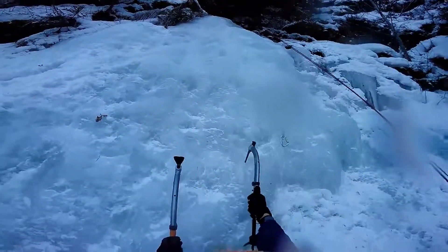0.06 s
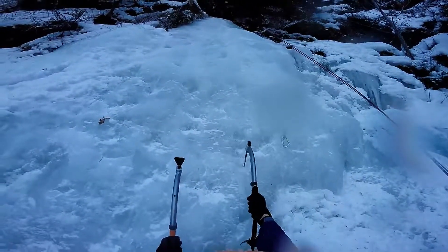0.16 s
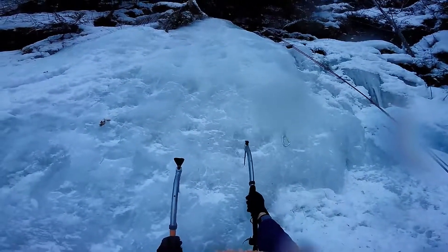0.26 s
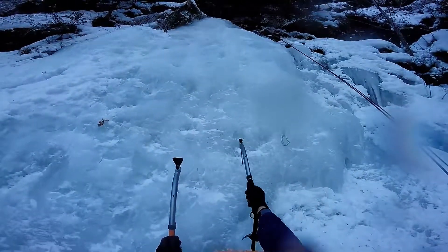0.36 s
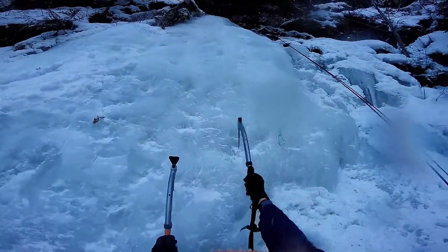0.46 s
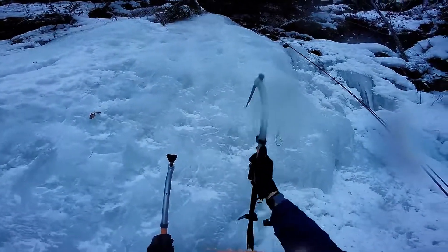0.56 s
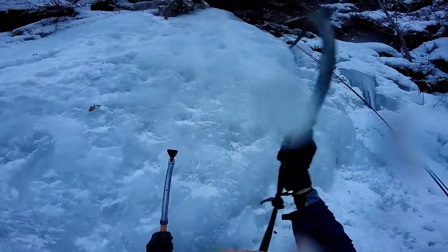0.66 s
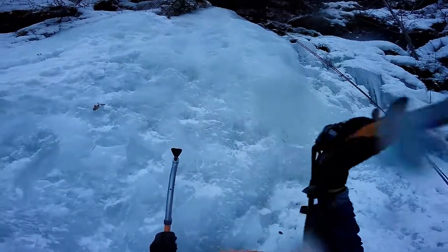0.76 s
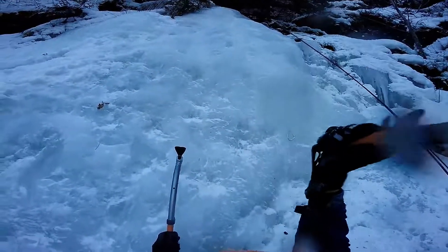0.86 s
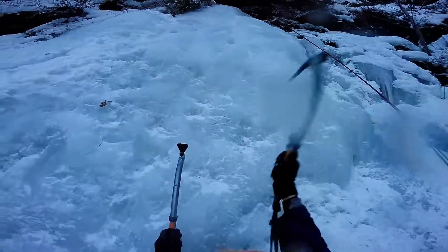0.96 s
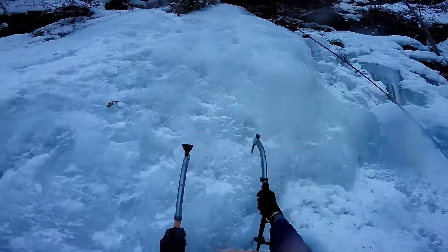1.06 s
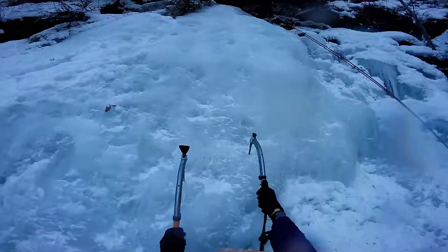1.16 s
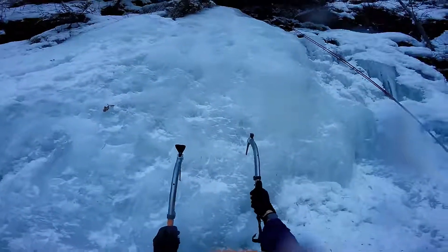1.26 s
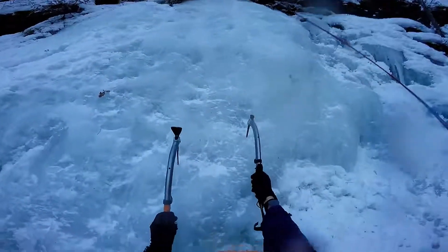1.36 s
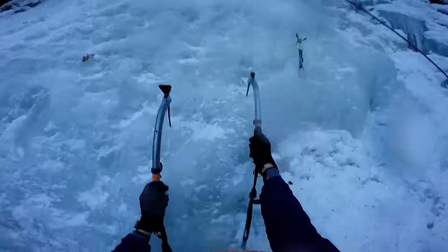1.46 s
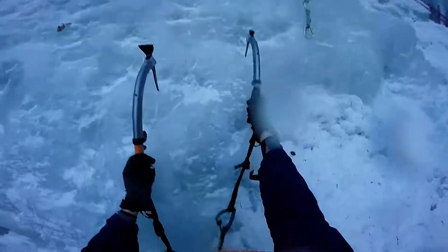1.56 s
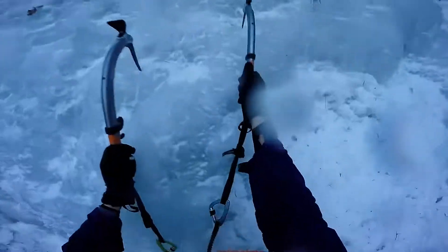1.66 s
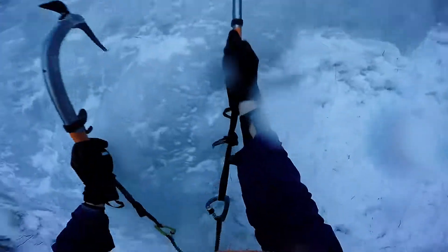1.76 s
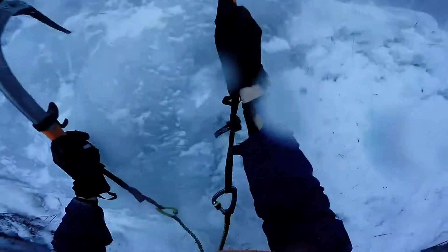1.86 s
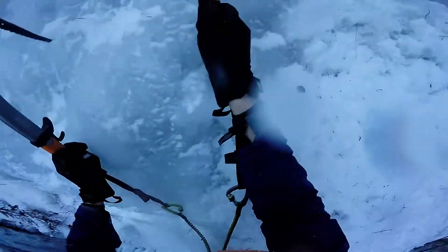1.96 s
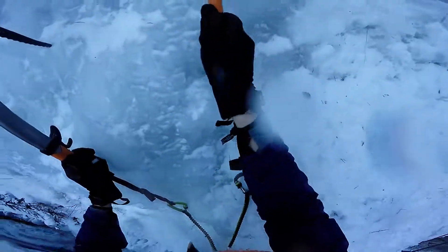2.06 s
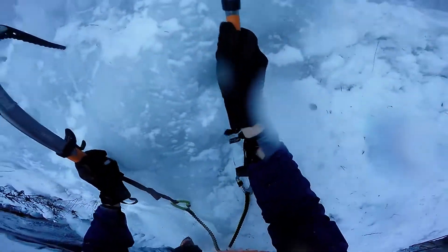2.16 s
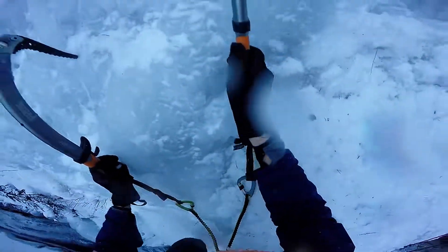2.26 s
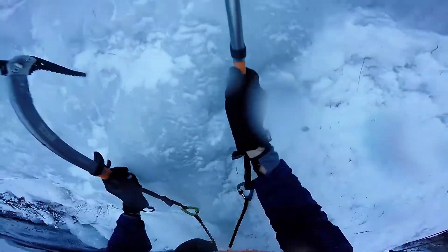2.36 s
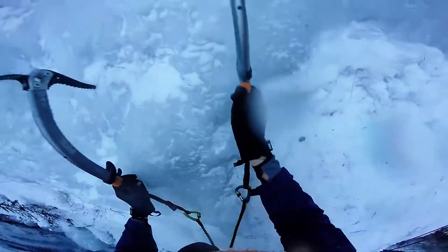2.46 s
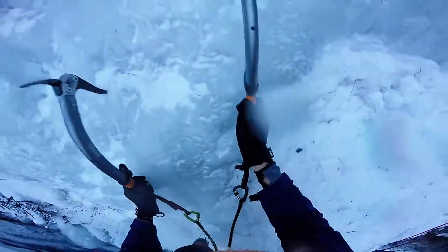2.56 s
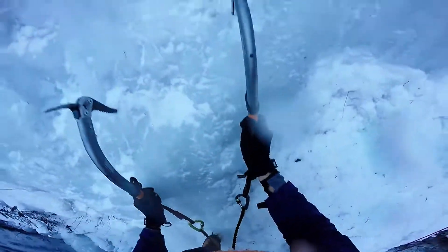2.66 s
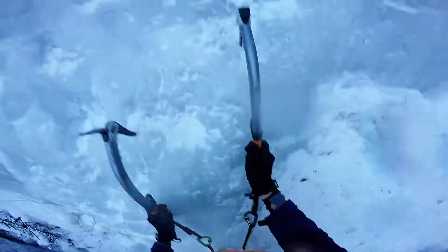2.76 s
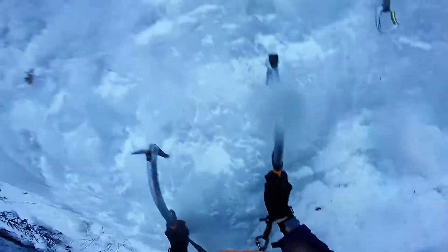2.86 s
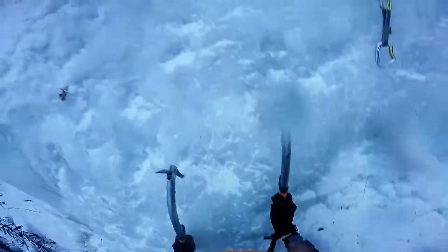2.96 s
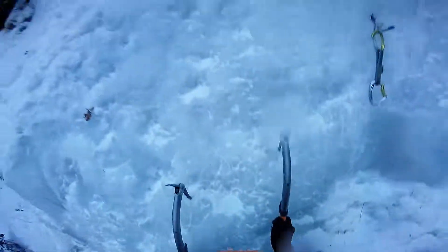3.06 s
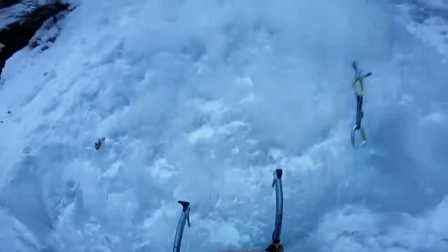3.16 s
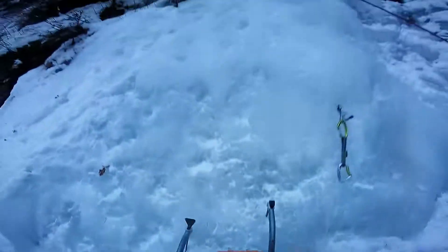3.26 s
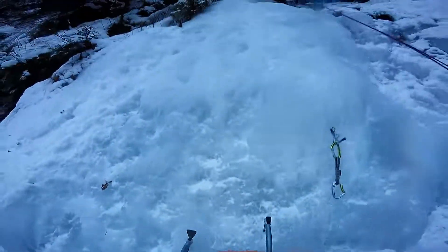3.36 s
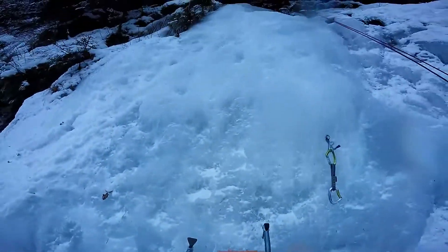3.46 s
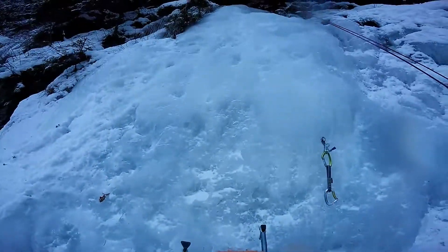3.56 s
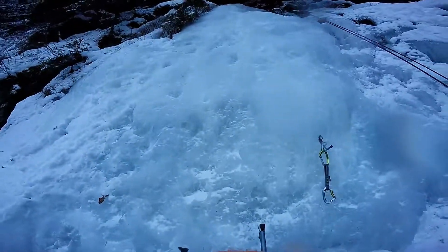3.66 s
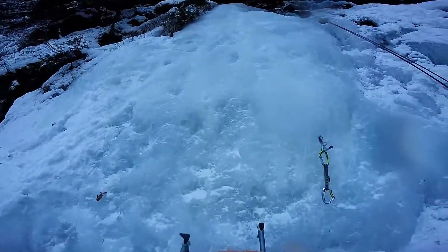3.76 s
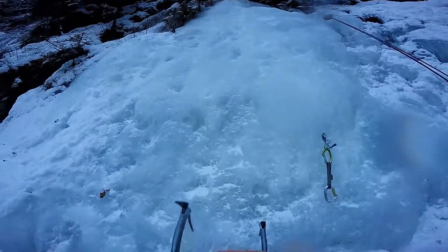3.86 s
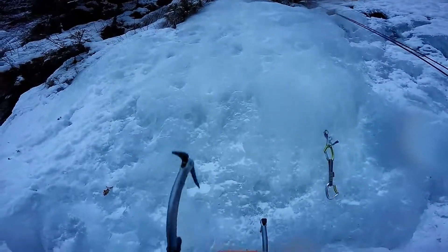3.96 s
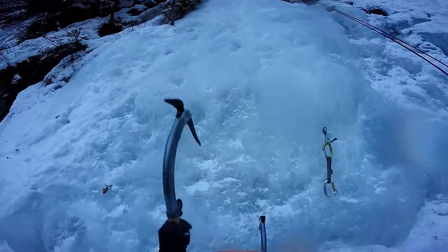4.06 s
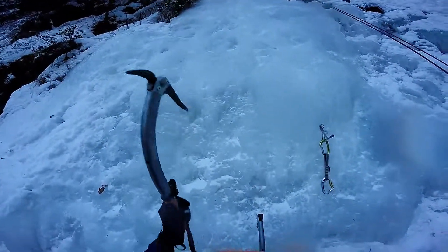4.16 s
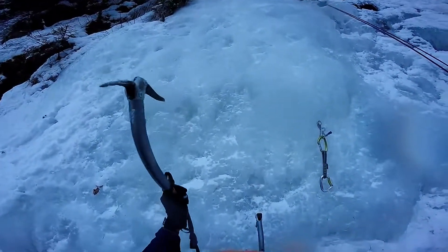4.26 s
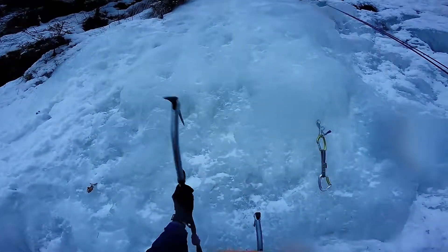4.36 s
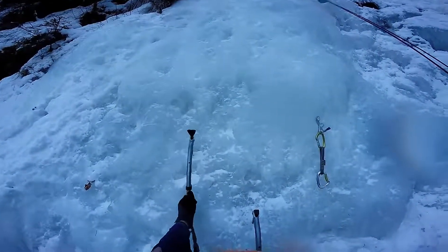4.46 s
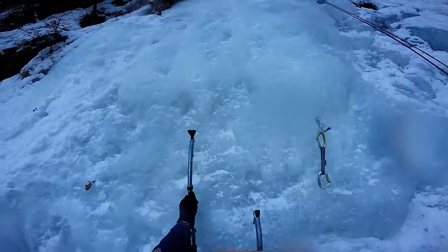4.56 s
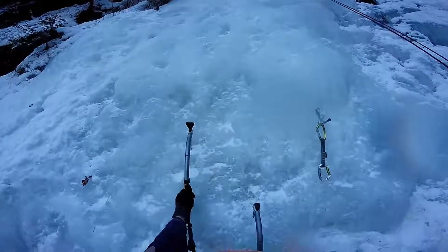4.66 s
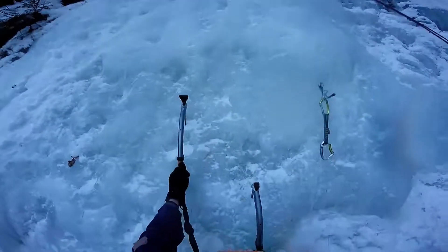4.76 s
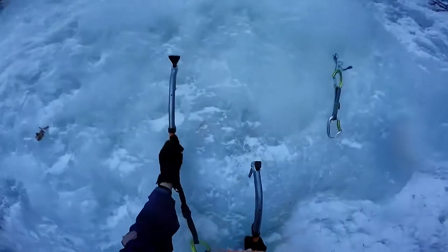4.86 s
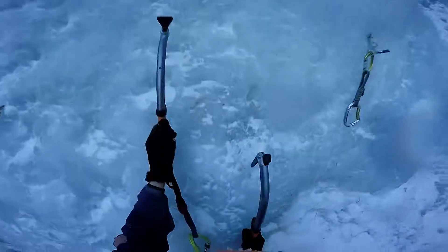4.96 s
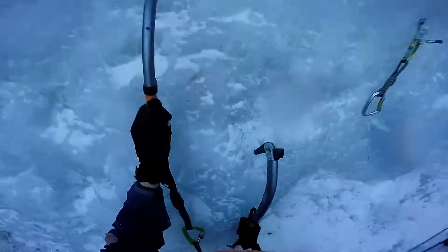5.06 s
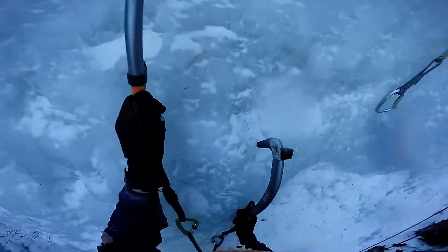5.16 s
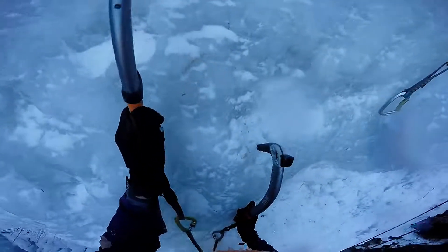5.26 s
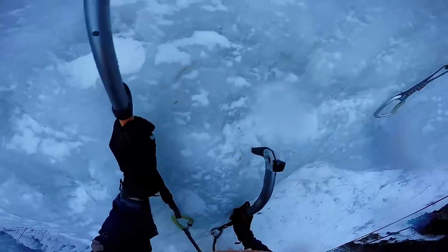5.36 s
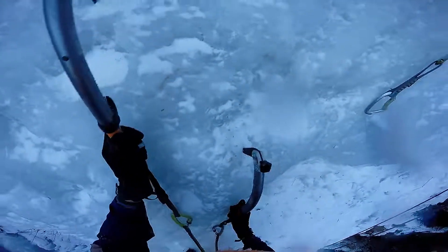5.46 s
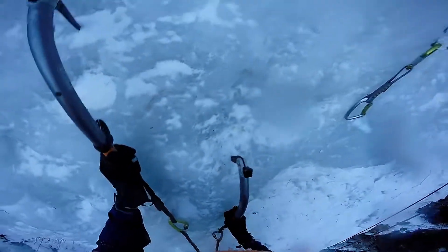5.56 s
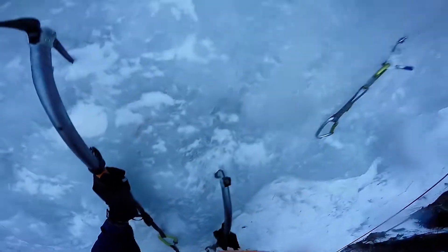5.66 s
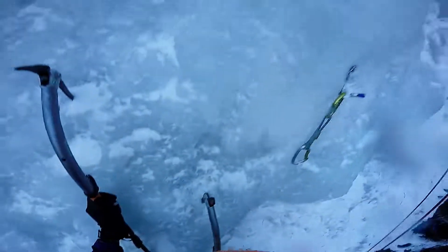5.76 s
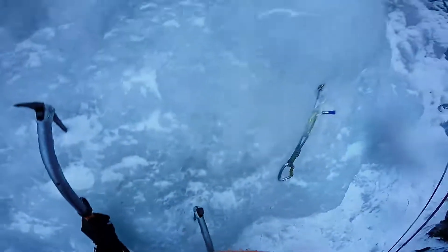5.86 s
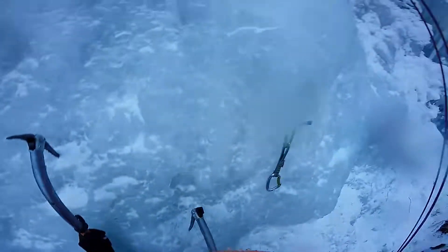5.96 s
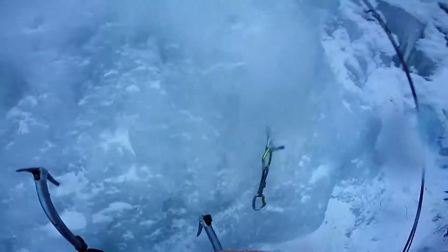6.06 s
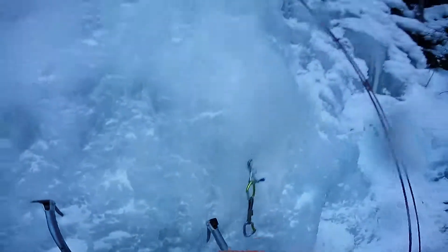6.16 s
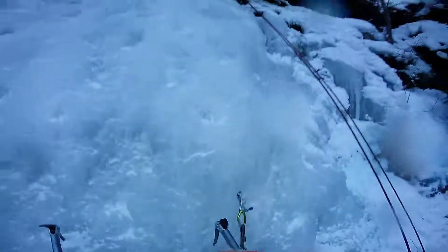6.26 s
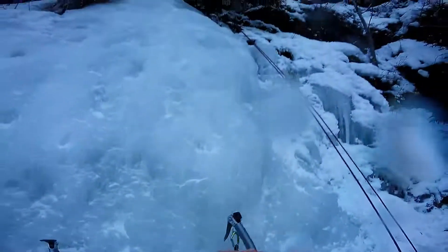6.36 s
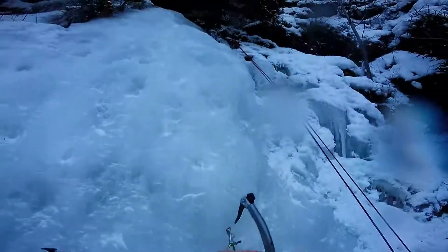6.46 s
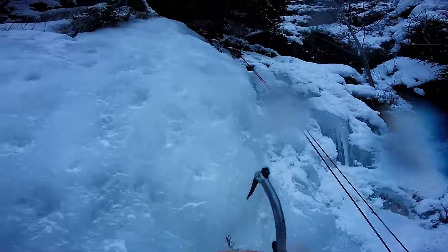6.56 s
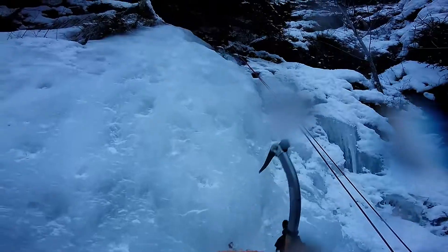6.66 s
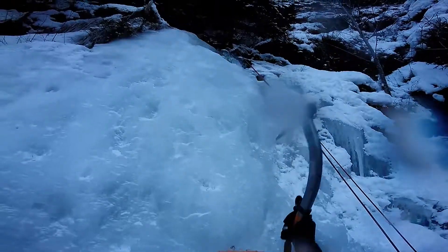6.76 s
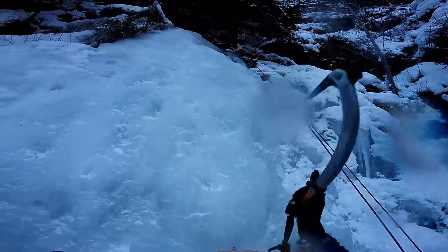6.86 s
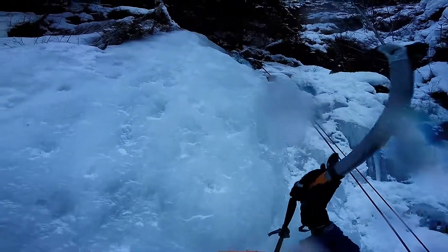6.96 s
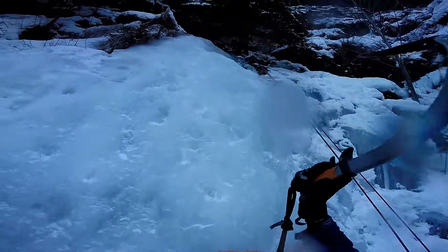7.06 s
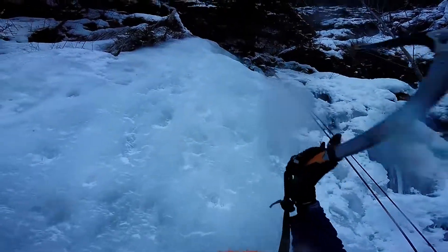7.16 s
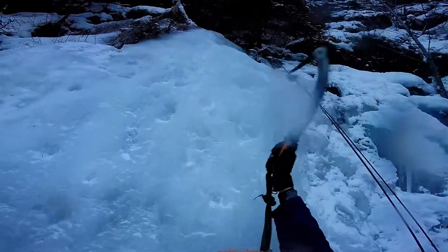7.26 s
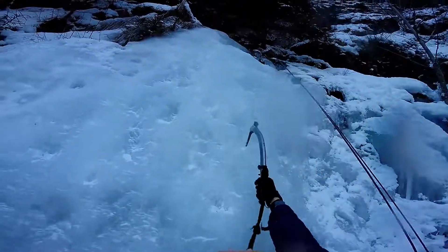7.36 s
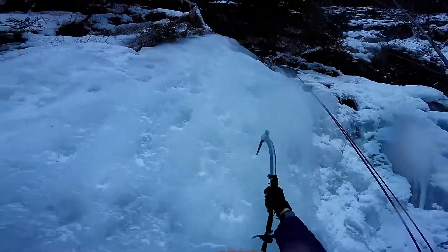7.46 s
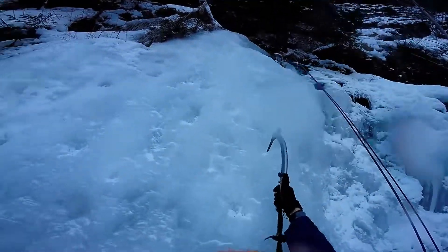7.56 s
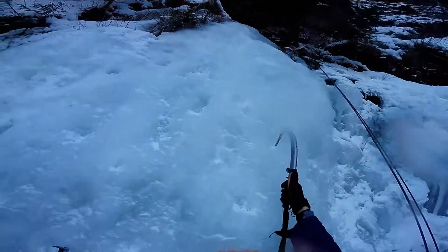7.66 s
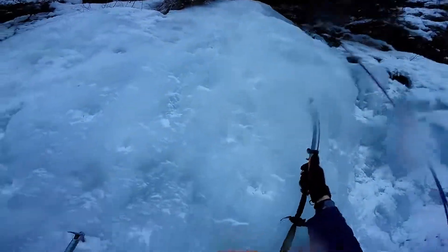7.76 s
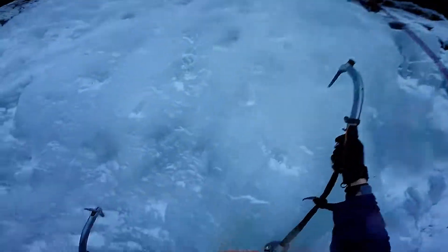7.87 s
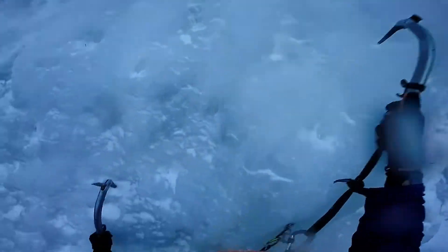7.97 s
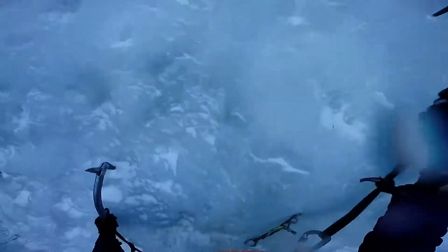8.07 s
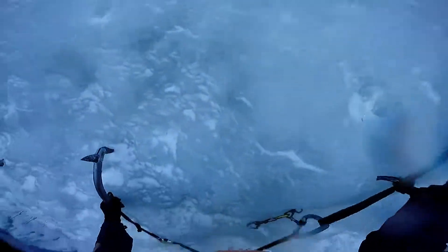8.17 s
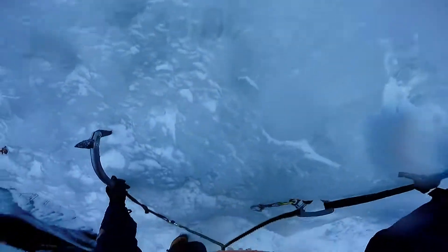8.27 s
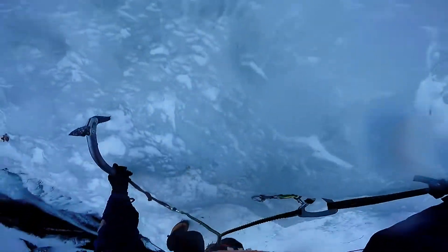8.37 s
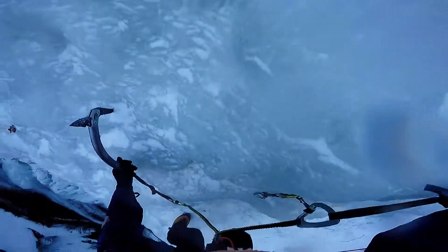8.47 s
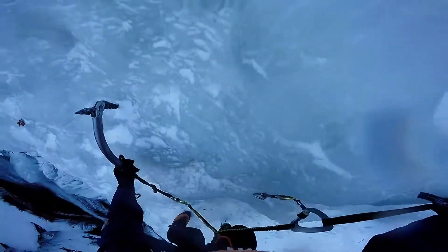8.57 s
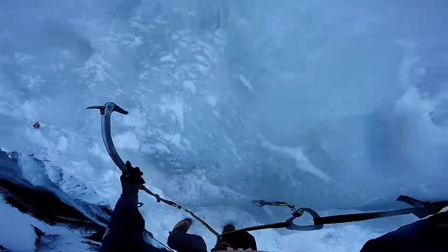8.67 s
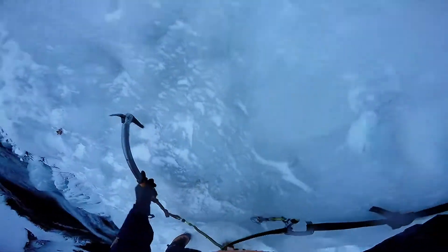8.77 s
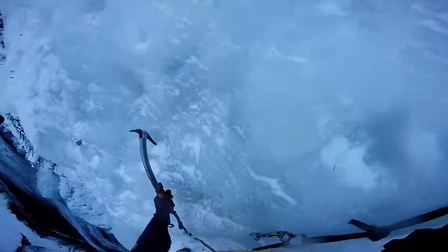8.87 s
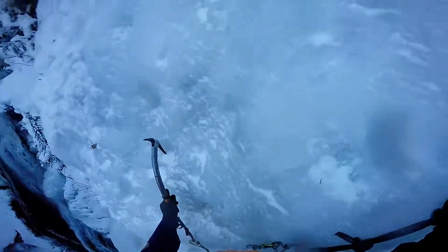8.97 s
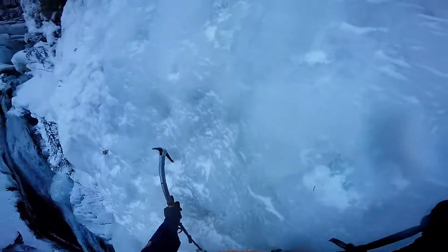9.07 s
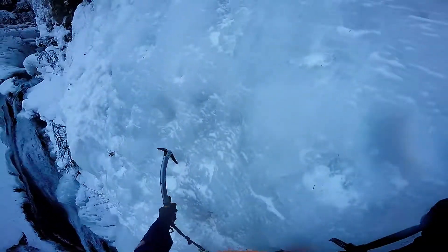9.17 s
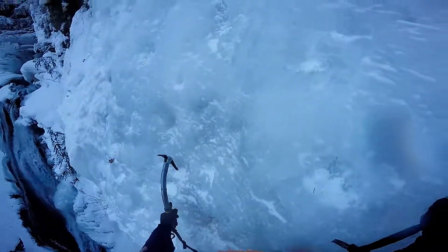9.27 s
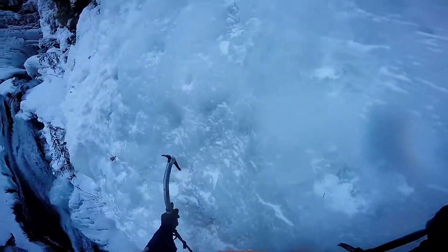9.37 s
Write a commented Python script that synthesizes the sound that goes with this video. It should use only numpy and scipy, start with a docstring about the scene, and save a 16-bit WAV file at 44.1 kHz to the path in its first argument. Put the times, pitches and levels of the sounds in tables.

```python
"""A frozen waterfall, heard from a camera microphone on the helmet of a climber swinging two ice axes.
Meltwater hisses nearby, changing colour as the head looks up and down; air rumbles on the microphone.
Straps rub, boots scrape and dull bumps come through the mount. At arm's length each pick crunches
in with one dry knock; ice chips and gear tick after it."""
import sys
import numpy as np
from scipy import signal
from scipy.fft import rfft, irfft, next_fast_len
from scipy.io import wavfile
from scipy.ndimage import uniform_filter1d, map_coordinates

SR = 44100
rng = np.random.default_rng(int(sys.argv[2]) if len(sys.argv) > 2 else 0)


def wav_record(signal):
    """Record a signal, one row per channel, as 16-bit PCM in the file named by sys.argv[1]."""
    frames = np.transpose(np.atleast_2d(signal))
    bounded = np.clip(frames, -1, 1)
    # unit amplitude maps onto the largest positive 16-bit level
    quanta = np.round(bounded * 32767).astype(np.int16)
    wavfile.write(sys.argv[1], SR, quanta)


N = 414981


def amp(db):
    """Decibels to gain."""
    return 10 ** (np.asarray(db) / 20)


def unit(x):
    """Scale to rms 1."""
    return x / np.sqrt(np.mean(x ** 2) + 1e-20)


def wobble(rate):
    """A smooth random curve, rate knots a second."""
    return map_coordinates(rng.standard_normal(int(N * rate / SR) + 4), [np.arange(N) * rate / SR])


def swell(s, rise, fall):
    """A gain that grows to 1 at time s and dies away, with time constants in seconds."""
    t = np.arange(N) / SR - s
    return np.exp(np.minimum(t / rise, -t / fall))


def colour(points, hz):
    """Gain through (frequency [Hz], level [dB]) points on a log axis."""
    freqs, db = np.transpose(points)
    return amp(np.interp(np.log(hz + 1), np.log(freqs), db))


def shade(bands, hz):
    """Sum in dB of smooth humps and dips (centre [Hz], width [Hz], gain [dB])."""
    return sum(db * np.exp(-((hz - centre) / width) ** 2) for centre, width, db in bands)


def resonances(modes, hz):
    """Response of damped modes (centre [Hz], width [Hz], level [dB]), alternating in sign."""
    return sum((-1) ** k * amp(db) * 1j * hz * width / (centre ** 2 - hz ** 2 + 1j * hz * width)
               for k, (centre, width, db) in enumerate(modes))


def filtered(x, response):
    """Pass x through a response given as a function of frequency."""
    size = next_fast_len(len(x) + SR // 10)
    return irfft(rfft(x, size) * response(np.fft.rfftfreq(size, 1 / SR)), size)[:len(x)]


def add(track, s, sound):
    """Lay a sound into a track so that its contact, 10 ms in, falls at time s."""
    at = round(s * SR) - SR // 100 + np.arange(len(sound))
    inside = (at >= 0) & (at < N)
    track[at[inside]] += sound[inside]


def crunch(length, crumble_db, crumble_t60, evenness):
    """Force of one contact: a brief swell of tiny fractures, then crumbs settling."""
    t = np.maximum(np.arange(SR // 4) - SR // 100, 0) / SR
    fractures = np.sin(np.pi * np.minimum(t / length, 1)) ** 2
    crumbs = amp(crumble_db - 60 * t / crumble_t60) * np.minimum(t / length, 1)
    spectrum = rfft(rng.standard_normal(len(t)) * np.sqrt(fractures + crumbs ** 2))
    # many fractures together push about equally at all frequencies
    return irfft(spectrum / (np.abs(spectrum) + 1e-9) ** evenness, len(t)) * (t > 0)


# The head, carrying the microphone: (look up [s], look down [s], turn right [0-1], bow [0-1])
HEAD_MOVES = [(-.3, 1.79, .5, 0.84), (3.2, 5.1, 0, 0.49), (6.15, 8.05, 0.6, .9)]

def head_pose(turn_s=0.59):
    """How far the head is bowed and turned right (0-1) as it aims, then looks down at the feet."""
    t = np.arange(N) / SR
    after = lambda s: np.clip(0.5 + (t - s) / turn_s, 0, 1)
    ends = [move[0] for move in HEAD_MOVES[1:]] + [np.inf]
    down, right = np.zeros(N), np.zeros(N)
    for (up_s, down_s, turn, bow), end_s in zip(HEAD_MOVES, ends):
        right += turn * (after(up_s) - after(down_s))
        down += bow * (after(down_s) - after(end_s))
    return down, right


# Meltwater near the climber: (time [s], relative level [dB])
WATER_LEVEL = [(0, -44), (1.6, -45), (5.9, -46), (7, -45), (8.3, -44.5), (9.4, -43)]
# Its hiss: (frequency [Hz], level [dB])
WATER_SPECTRUM = [(200, -12), (380, -18.5), (520, -13.5), (720, -19), (1000, -10.5), (1450, -3), (2000, -1),
                  (2900, -3.5), (4000, -9.5), (5600, -13), (7000, -15.5), (10300, -18), (11800, -23.5),
                  (15500, -27)]
# Bands that head and ice wall favour or shade in each pose: (centre [Hz], width [Hz], gain [dB])
TINT_UP = [(1700, 50, -6.5), (1900, 160, 3.5), (2320, 107, -4), (3470, 38, 5), (3990, 270, 3.5),
           (6400, 580, -3), (9550, 710, 7.5), (10830, 290, 3)]
TINT_DOWN = [(1960, 1300, -2), (2744, 280, 8.5), (3525, 180, -5.5), (4170, 85, -6.5), (5420, 150, 4),
             (6060, 290, -7.5), (7570, 770, 5), (8800, 300, -4), (9600, 420, 5), (11200, 890, -4.5)]
TINT_RIGHT = [(2200, 1300, 2.5), (6880, 190, 12.5), (8100, 200, 6.5), (9370, 990, -8)]

def meltwater():
    """A fine splashing hiss nearby, whose colour follows the pose of the head."""
    t = np.arange(N) / SR
    splash = rng.standard_normal(N) * amp(0.73 * wobble(300) + 0.29 * wobble(9.7))
    hiss = unit(filtered(splash, lambda hz: colour(WATER_SPECTRUM, hz)))
    freqs, frame_s, frames = signal.stft(hiss, SR, nperseg=1024)
    down, right = [np.interp(frame_s, t, share) for share in head_pose()]
    views = [(TINT_UP, 1 - down), (TINT_DOWN, down), (TINT_RIGHT, right)]
    tint_db = sum(np.outer(shade(bands, freqs), share) for bands, share in views)
    tinted = signal.istft(frames * amp(tint_db), SR, nperseg=1024)[1][:N]
    level_db = np.interp(t, *np.transpose(WATER_LEVEL))
    return amp(level_db - 1.52) * tinted


# The body reaches or pulls up: (time [s], rise [s], fall [s], air level [dB], strap level [dB])
BODY_PULLS = [(1.92, 0.15, 0.73, -30, -57), (5.15, 0.031, 0.063, -31.5, -55),
              (7.28, 0.15, 0.85, -44.5, -56), (8.83, 0.056, 0.37, -41, -70)]

def airflow(rest_db=-47):
    """Relative strength of the air passing the microphone: more after each swing and with each pull."""
    swings = [amp(db) * swell(s + 0.093, rise=0.059, fall=0.071) for s, *_, db in AXE_BLOWS]
    pulls = [amp(db) * swell(s, rise, fall) for s, rise, fall, db, _ in BODY_PULLS]
    return np.hypot(amp(rest_db), np.linalg.norm(swings + pulls, axis=0))


# Eddies right at the microphone: (frequency [Hz], level [dB])
EDDY_SPECTRUM = [(8, -3.5), (20, 5), (45, -4), (62, -6), (75, -16), (95, -27), (130, -36), (900, -120)]

def air_rumble(lump_db=2, lumps_per_s=9):
    """Slow eddies push on the microphone in lumps, as hard as the air flows."""
    eddies = unit(filtered(rng.standard_normal(N), lambda hz: colour(EDDY_SPECTRUM, hz)))
    flutter = filtered(eddies, lambda hz: hz > 38)
    envelope = np.sqrt(uniform_filter1d(np.abs(signal.hilbert(flutter)) ** 2, size=7000))
    lumps = amp(lump_db * wobble(lumps_per_s))
    push = amp(6.5) * airflow() * unit(lumps * eddies / envelope)
    return filtered(push, lambda hz: colour([(80, 3), (160, -22.5), (500, -38)], hz))


def friction(rough_db, rate):
    """Stick and slip: noise whose level jumps about rate times a second."""
    return rng.standard_normal(N) * amp(rough_db * wobble(rate))


def straps(rest_db=-68):
    """Straps rub on the helmet beside the microphone, shifting around every bump and pull."""
    jolts = [amp(db - 25) * swell(s, rise=0.08, fall=0.21) for s, db in MOUNT_BUMPS]
    pulls = [amp(db) * swell(s, rise, fall) for s, rise, fall, _, db in BODY_PULLS]
    load = np.hypot(amp(rest_db), np.linalg.norm(jolts + pulls, axis=0))
    shell = lambda hz: resonances(HELMET_MODES, hz) + amp(-13) * resonances(MOUNT_MODES[:2], hz)
    return amp(-2) * load * unit(filtered(friction(rough_db=5.5, rate=59), shell))


# Boots and points, a body's length below: (time [s], length [s], centre [Hz], level [dB])
BOOT_SCUFFS = [(1.857, 0.064, 1350, -38.5), (2.728, 0.07, 3280, -48), (3.212, 0.2, 1460, -44.5),
               (5.115, 0.067, 1480, -44.5), (5.713, 0.077, 1390, -43.5), (6.258, 0.18, 1420, -49.5)]

def boots():
    """Boots scrape the ice in short grainy strokes."""
    out = np.zeros(N)
    grit = friction(rough_db=4.0, rate=260)
    for s, length, centre, db in BOOT_SCUFFS:
        stroke = np.sin(np.pi * np.clip((np.arange(N) / SR - s) / length, 0, 1))
        scrape = filtered(grit, lambda hz: resonances([(centre, 0.42 * centre, 0)], hz) ** 2)
        out += amp(db) * stroke * unit(scrape)
    return out


# Bumps reaching the microphone through its mount: (time [s], relative level [dB])
MOUNT_BUMPS = [(0.093, -31), (1.204, -30.5), (1.676, -35), (2.076, -36), (2.23, -37.5), (2.441, -34),
               (2.489, -27.5), (2.579, -25.5), (3.052, -29.5), (3.123, -37), (3.246, -37.5), (3.979, -49),
               (5.782, -31.5), (5.843, -37), (5.984, -40.5), (6.206, -33), (9.161, -44), (9.292, -50)]
# Modes of the mount and of the helmet shell under it: (centre [Hz], width [Hz], level [dB])
MOUNT_MODES = [(525, 44, 0), (950, 133, -2.5), (1420, 128, 3), (1764, 91, -0.5), (2360, 660, -11.5),
               (4570, 750, -18)]
HELMET_MODES = [(134, 8.1, 5), (204, 30, -5), (323, 38, -14)]

def bumps():
    """Jolts of the body knock the camera mount and make the helmet shell thud."""
    out = np.zeros(N)
    for s, db in MOUNT_BUMPS:
        force = crunch(length=0.00362, crumble_db=-10, crumble_t60=0.071, evenness=1)
        knock = filtered(force, lambda hz: resonances(MOUNT_MODES, hz))
        thud = filtered(force, lambda hz: resonances(HELMET_MODES, hz))
        add(out, s, amp(db - 20) * unit(knock))
        add(out, s, amp(0.57 * db - 38.5) * unit(thud))  # grows more slowly than the knock
    return out


def gully_echo(x, t60):
    """Rock and trees around the fall scatter a short answer."""
    t = np.arange(SR // 2) / SR
    tail = rng.standard_normal(len(t)) * amp(-60 * t / t60)
    return signal.fftconvolve(x, tail / np.linalg.norm(tail))[:N]


# Ice chips and gear close by: (time [s], relative level [dB], low ring [Hz], upper ring [Hz])
CHIP_TICKS = [(.2143, -25, 2970, 4700), (0.2977, -21, 2500, 4600), (.557, -27.5, 2820, 7850),
              (0.6108, -27.5, 2750, 4400), (1.1806, -24, 1590, 2720), (1.199, -18.5, 1530, 5540),
              (1.837, -29, 2750, 3130), (2.2295, -27, 1440, 1690), (2.277, -25, 2880, 4100),
              (5.424, -25.5, 2840, 4300), (7.8866, -19, 1610, 4850), (8.0557, -22, 1500, 2434),
              (8.077, -24.5, 2380, 4650), (8.1052, -24, 1670, 2600), (8.1435, -26.5, 1600, 4640),
              (8.1851, -18.5, 1460, 4600), (8.1956, -23.5, 1360, 7940), (8.382, -31, 1030, 1650)]
# Breaking ice, in chips and under the pick: (frequency [Hz], level [dB])
CRACK_SPECTRUM = [(200, -17), (450, -7.5), (700, -24), (1000, -2), (2500, 8), (4000, 2.5), (9000, -4.5),
                  (12000, -14), (15500, -20)]

def chips(mid_hz=2110, bright_db_per_octave=4):
    """Small hard contacts: each piece ticks and rings at its own pitches, the small ones brightest."""
    out = np.zeros(N)
    for s, db, low_hz, upper_hz in CHIP_TICKS:
        force = crunch(length=0.0021, crumble_db=1.5, crumble_t60=0.03, evenness=0.33)
        upper_db = -3 + bright_db_per_octave * np.log2(low_hz / mid_hz)
        modes = [(low_hz, 190, 0), (upper_hz, 220, upper_db), (1.564 * upper_hz, 420, upper_db - 13)]
        chip = filtered(force, lambda hz: resonances(modes, hz) + amp(-20.5) * colour(CRACK_SPECTRUM, hz))
        add(out, s, amp(db - 26.5) * unit(chip))
    return out


# Picks biting at arm's length: (time [s], relative level [dB], main ring [Hz], its gain [dB],
# upper ring [Hz], its gain [dB], shaft knock [dB], splinter [dB], bite length [s], air push [dB])
AXE_BLOWS = [(.0022, -6.5, 2730, 0.5, 4610, 25, 4, 4, 0.0046, -24.5),
             (1.113, -3.5, 2930, 7.5, 7450, 8, 5.5, 5, 0.006, -24),
             (4.518, -2.5, 2620, 4.5, 4490, 16.5, 0.5, -5, 0.008, -36),
             (7.4510, -5, 3020, 11, 6040, 10, 0.5, 1, 0.0037, -31)]
# Modes of the axe held in the ice: (centre [Hz], width [Hz], level [dB])
AXE_MODES = [(1477, 135, -3), (1740, 80, 1), (2020, 94, -5.5), (2640, 148, 7), (2980, 110, 3),
             (3314, 150, 4.5), (4436, 200, -13), (5070, 104, -2), (6020, 210, -13), (6330, 120, -3.5),
             (7380, 430, -12.5), (8080, 150, -5), (10300, 570, -20)]

def axes(tick_delay_s=0.0925, tick_length_s=0.004):
    """The pick breaks in, then gives a weaker, brighter tick; its grip in the ice favours two rings."""
    out = np.zeros(N)
    for s, db, ring_hz, ring_db, upper_hz, upper_db, knock_db, splinter_db, length, _ in AXE_BLOWS:
        def axe_in_ice(hz):
            grip = amp(shade([(ring_hz, 200, ring_db), (upper_hz, 200, upper_db)], hz))
            # a solid hold knocks low in the shaft; brittle ice splinters in the treble
            bite = colour([(1750, knock_db), (2300, 0), (6400, 0), (8000, splinter_db)], hz)
            return bite * (resonances(AXE_MODES, hz) * grip + amp(-17) * colour(CRACK_SPECTRUM, hz))

        def contact(seconds):
            force = crunch(seconds, crumble_db=-2.5, crumble_t60=0.033, evenness=0.62)
            return filtered(force, axe_in_ice)

        tick = filtered(contact(tick_length_s), lambda hz: colour([(3000, 0), (4800, 4.5)], hz))
        add(out, s, amp(db - 27) * unit(contact(length)))
        add(out, s + tick_delay_s, amp(db - 47) * unit(tick))
    return out


def scene():
    """Blows and chips in the open air, over the climber's movements and the water, in mono."""
    hits = axes() + chips()
    echo = amp(-26) * gully_echo(hits, t60=0.31)
    return (hits + echo + bumps() + straps() + boots() + air_rumble() + meltwater())[None]


def record(dry):
    """The helmet camera keeps nothing above its band limit."""
    top_hz = 15500
    return filtered(dry[0], lambda hz: 1 / (1 + (hz / top_hz) ** 120))[None]


dry = scene()
out = record(dry)
wav_record(out)
```